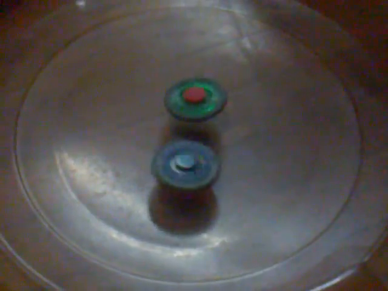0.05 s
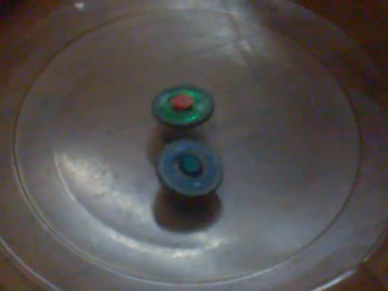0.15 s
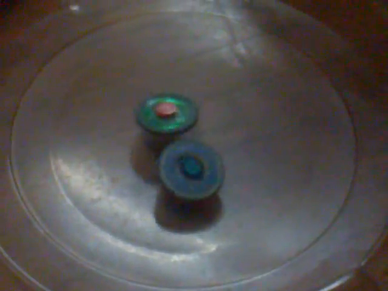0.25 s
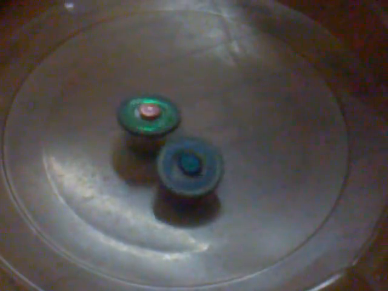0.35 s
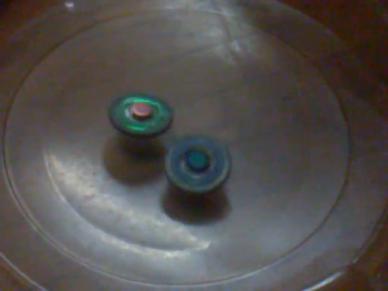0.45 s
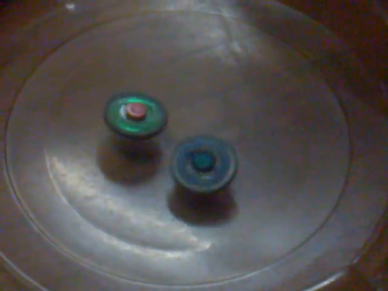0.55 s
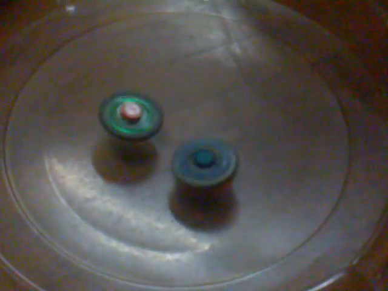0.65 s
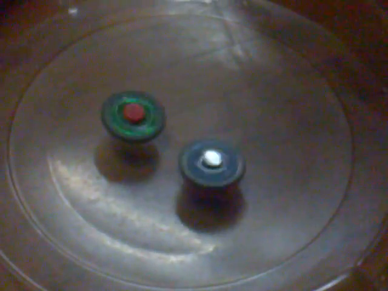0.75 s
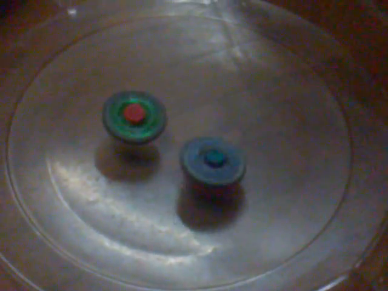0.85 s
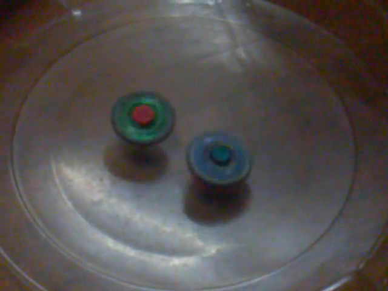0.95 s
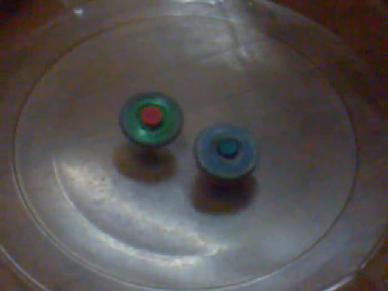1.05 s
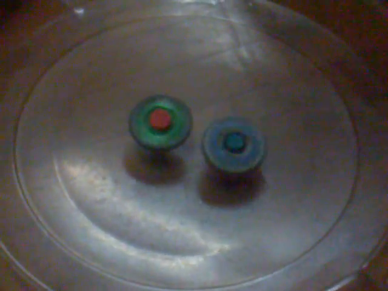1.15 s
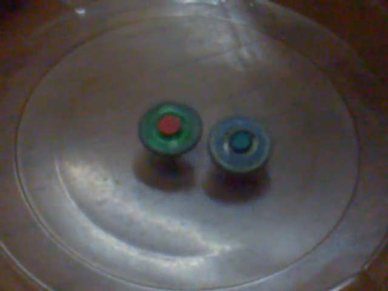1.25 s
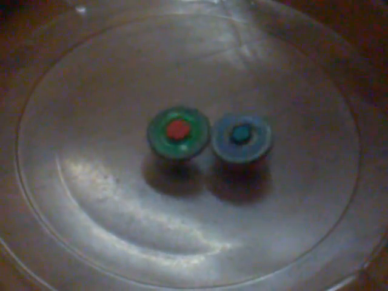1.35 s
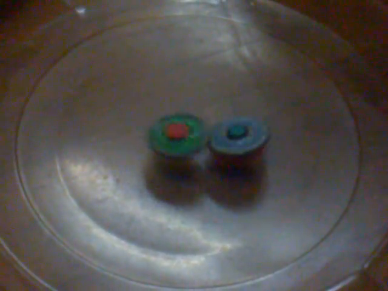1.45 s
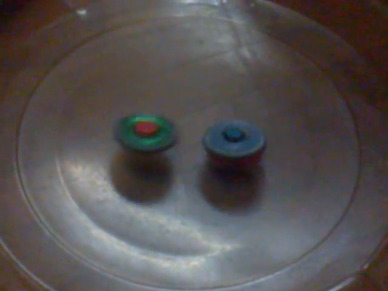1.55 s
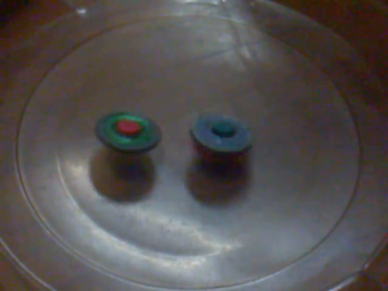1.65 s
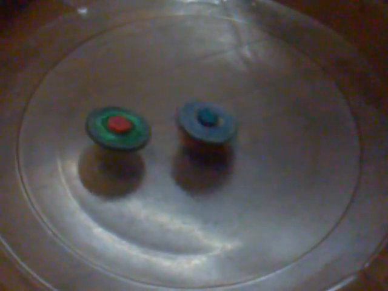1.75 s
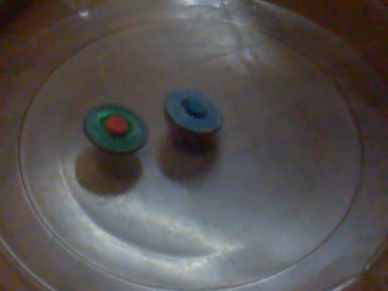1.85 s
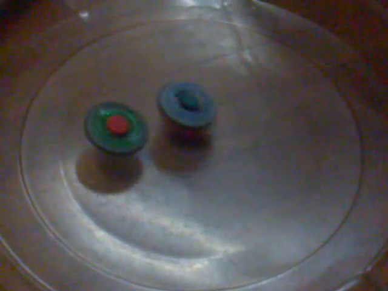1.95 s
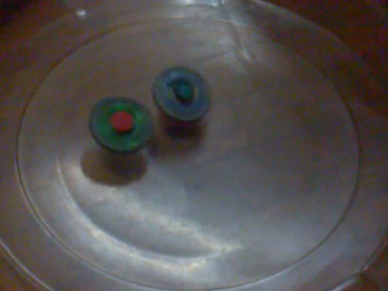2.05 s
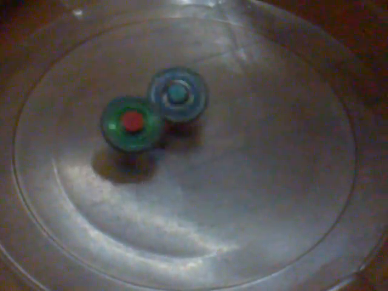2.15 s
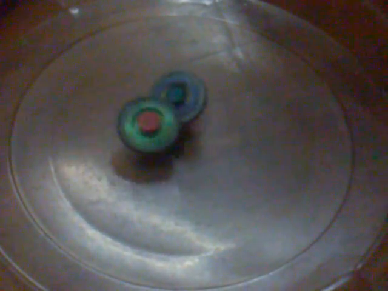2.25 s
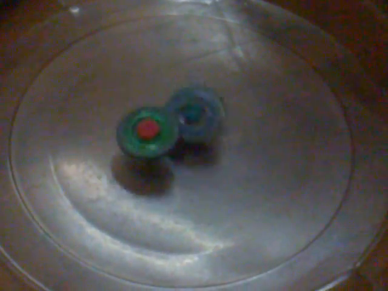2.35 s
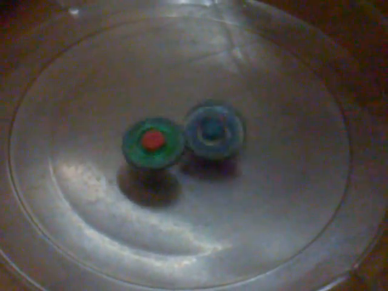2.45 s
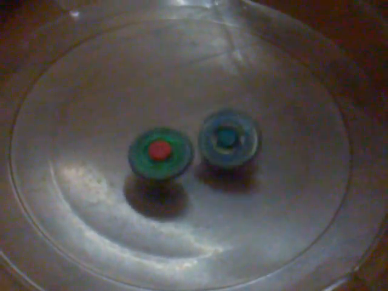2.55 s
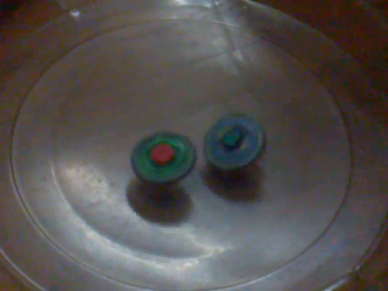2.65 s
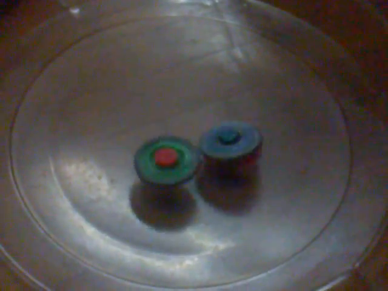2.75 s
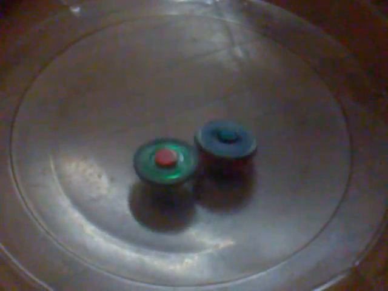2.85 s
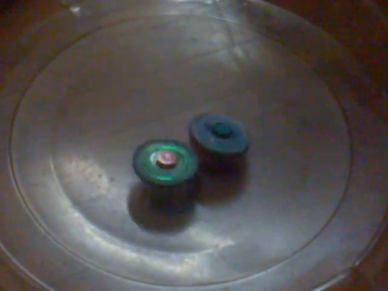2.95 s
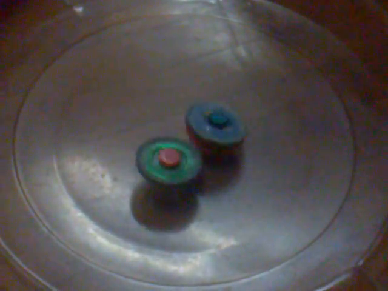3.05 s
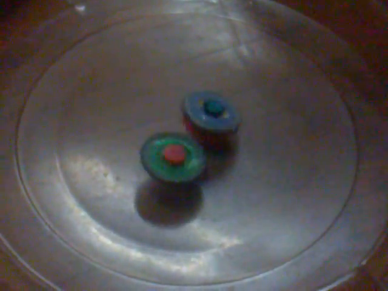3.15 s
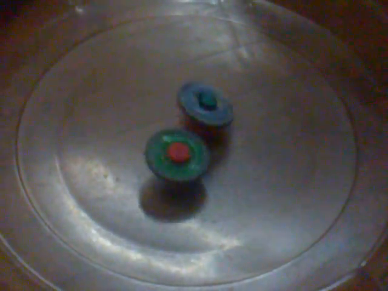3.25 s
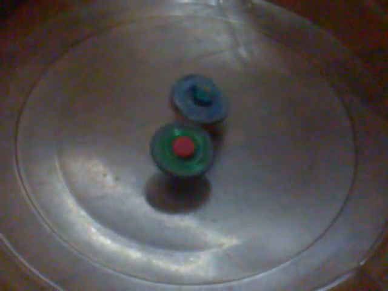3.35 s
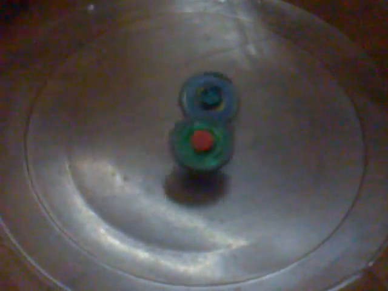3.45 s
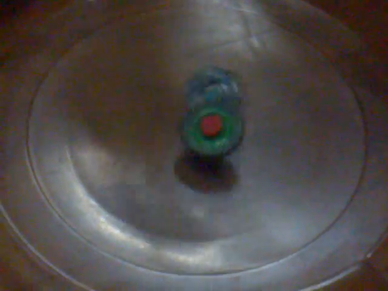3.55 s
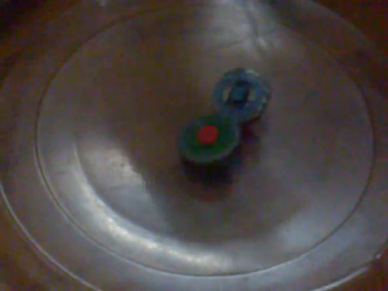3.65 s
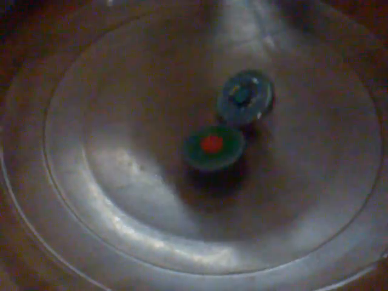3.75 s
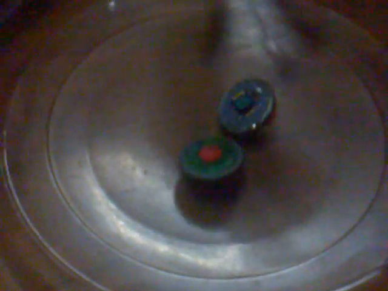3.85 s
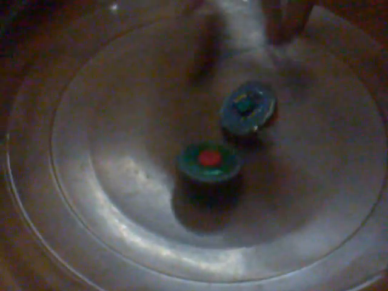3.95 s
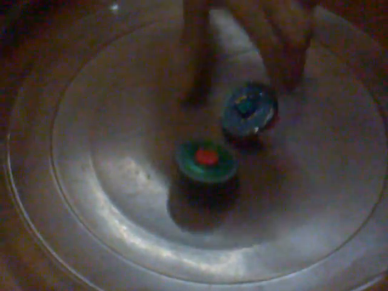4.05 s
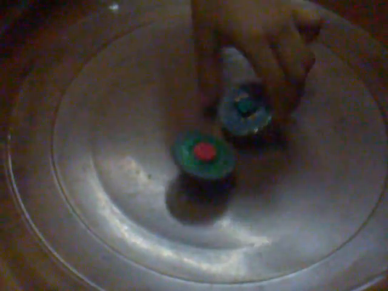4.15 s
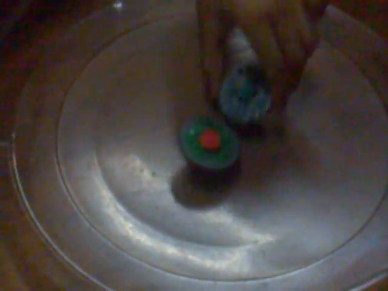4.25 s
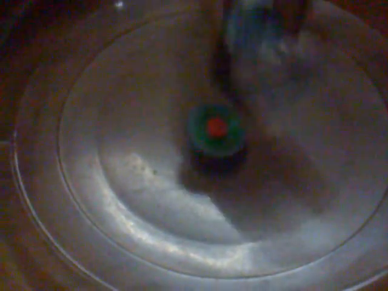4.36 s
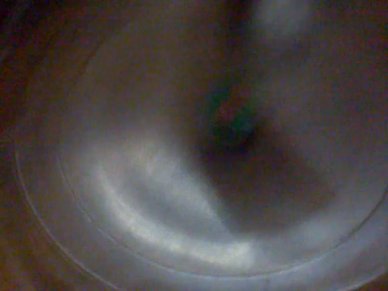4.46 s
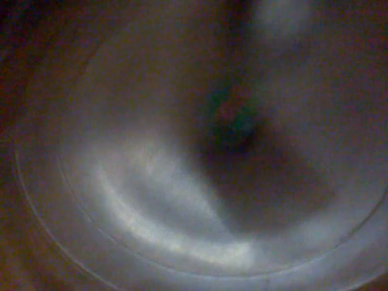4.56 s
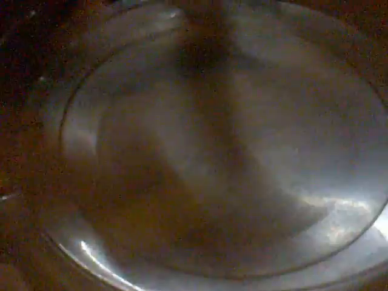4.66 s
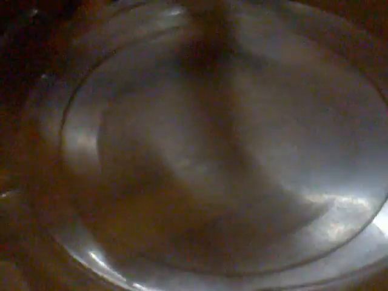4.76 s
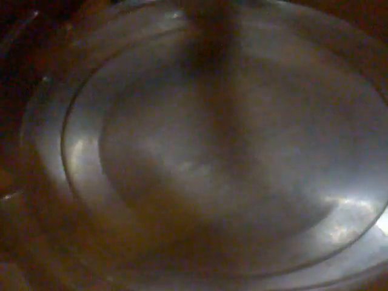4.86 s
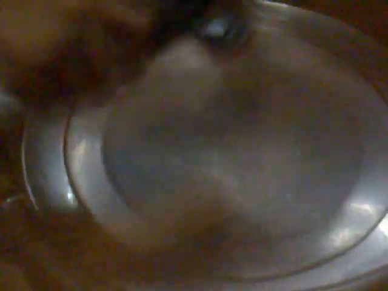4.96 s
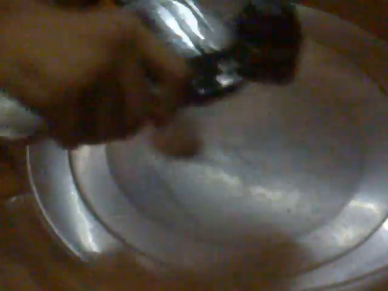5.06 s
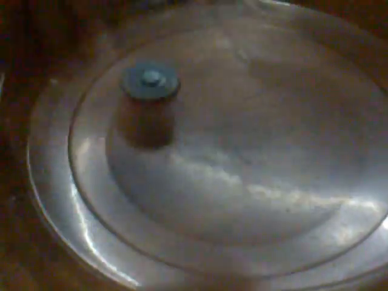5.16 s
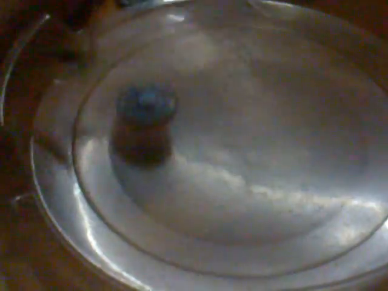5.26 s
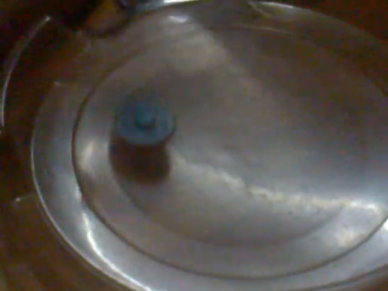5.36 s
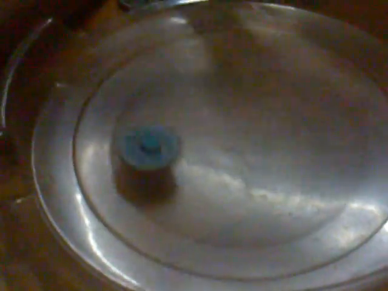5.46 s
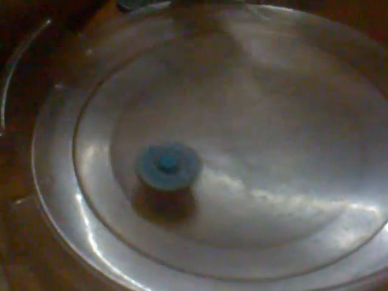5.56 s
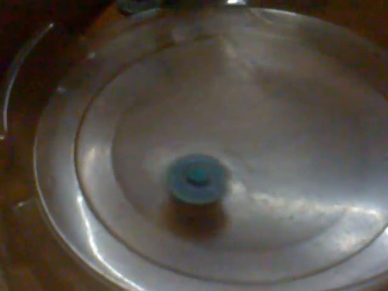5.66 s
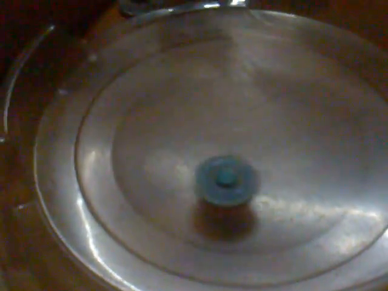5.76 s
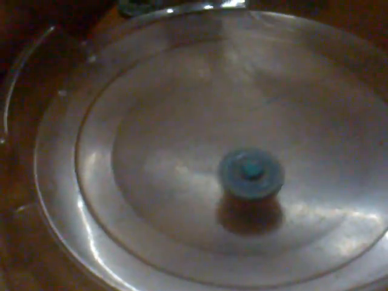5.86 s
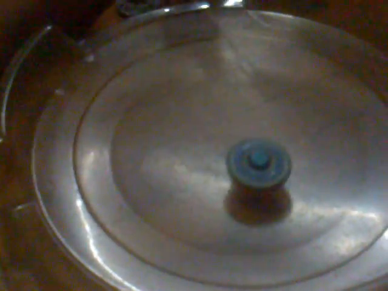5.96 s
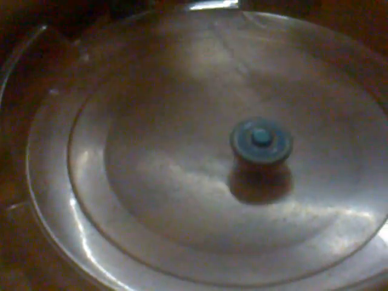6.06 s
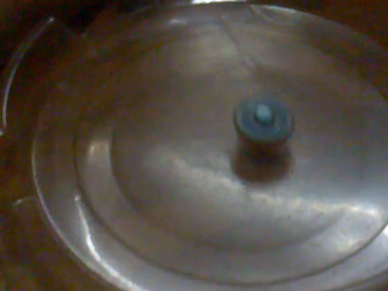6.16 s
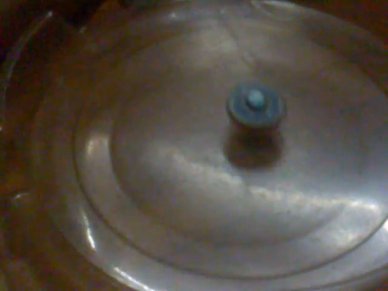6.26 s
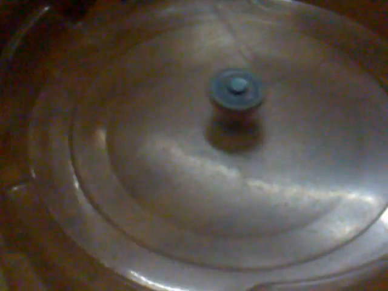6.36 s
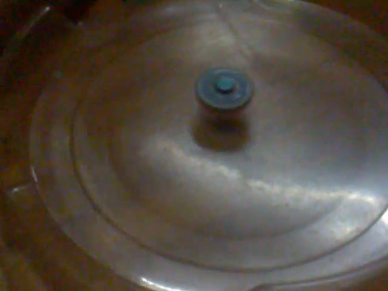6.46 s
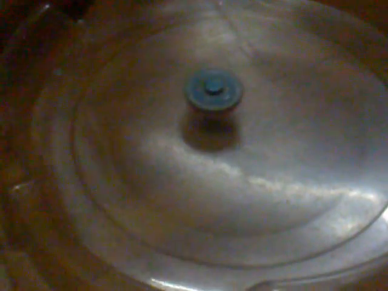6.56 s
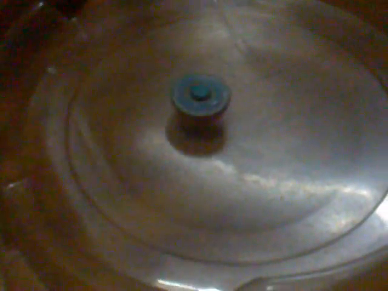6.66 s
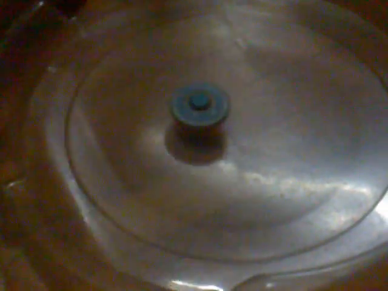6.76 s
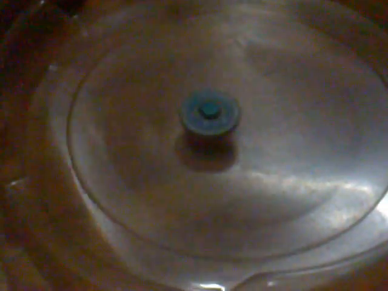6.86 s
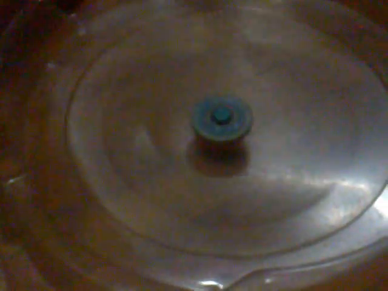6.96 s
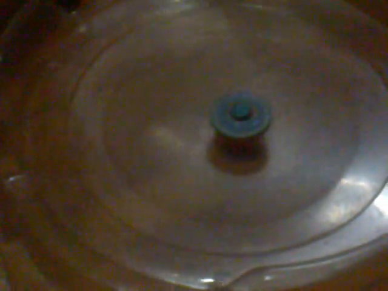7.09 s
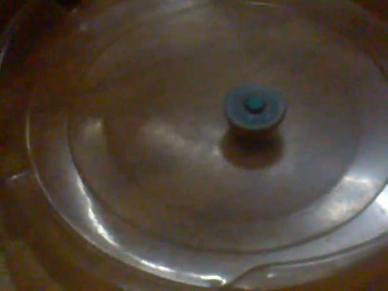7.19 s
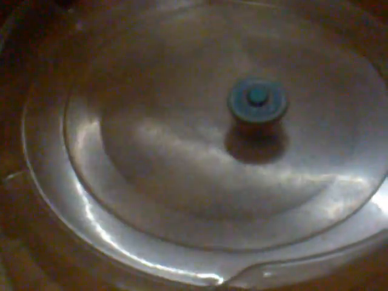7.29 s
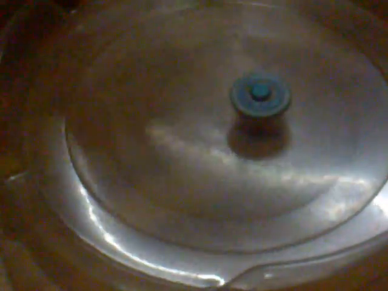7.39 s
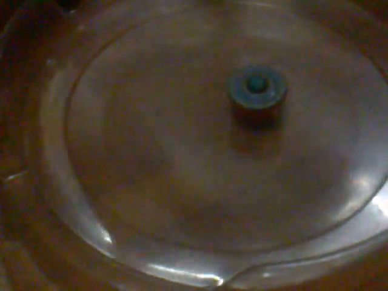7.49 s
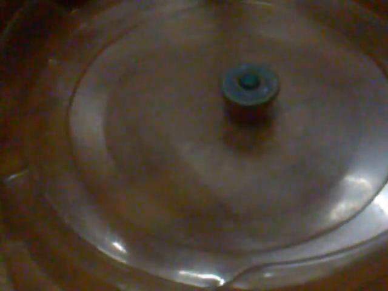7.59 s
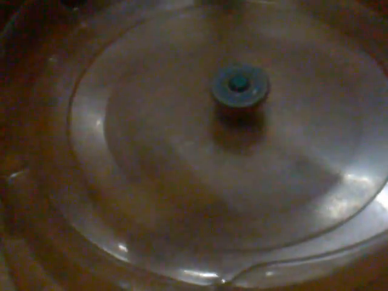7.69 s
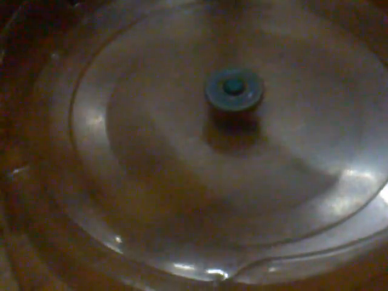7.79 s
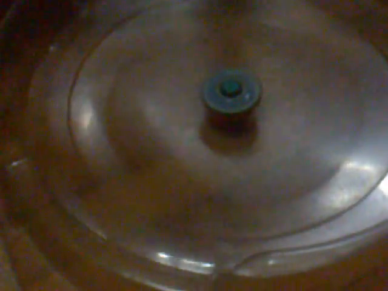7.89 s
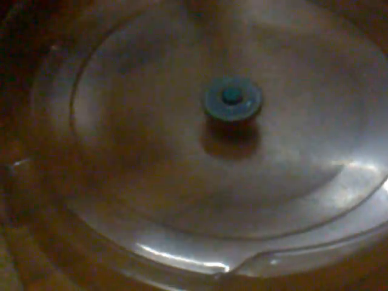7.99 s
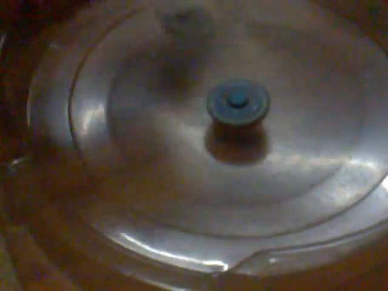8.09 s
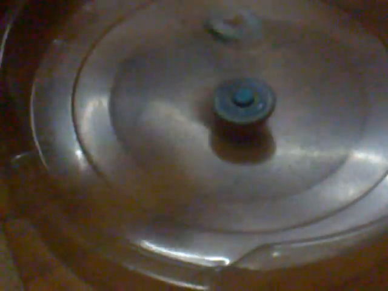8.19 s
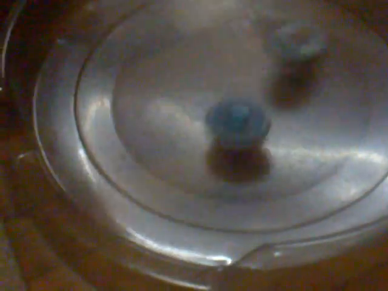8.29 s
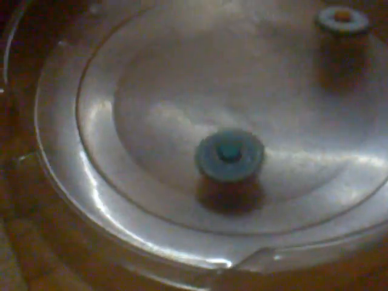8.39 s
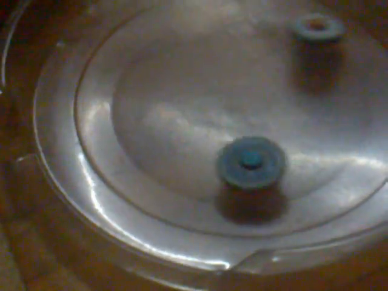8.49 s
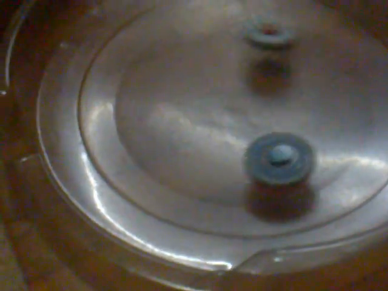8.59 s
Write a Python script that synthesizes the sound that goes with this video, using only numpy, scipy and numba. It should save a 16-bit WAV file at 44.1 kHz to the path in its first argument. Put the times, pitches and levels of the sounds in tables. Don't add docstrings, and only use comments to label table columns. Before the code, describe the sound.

Two plastic spinning tops clatter together in a thin plastic bowl, then a ripcord buzzes and another top drops in, hums, and is joined by one more.

```python
import sys
import numpy as np
from scipy import signal
from scipy.fft import rfft, irfft
from scipy.io import wavfile
from scipy.ndimage import uniform_filter1d
from numba import njit

SR = 44100
rng = np.random.default_rng(int(sys.argv[2]) if len(sys.argv) > 2 else 0)


def amplitude_ratio(level_db):
    exponent = np.asarray(level_db, float) / 20
    return 10 ** exponent


def to_wav(s):
    ch = np.atleast_2d(s).T
    pcm = np.round(np.clip(ch, -1, 1) * 32767)
    wavfile.write(sys.argv[1], SR, pcm.astype(np.int16))


N = 380583

# frequency in Hz, width in Hz, level in dB.
BOWL = [(71, 23, -13.5), (136, 58, -4), (218, 150, -4), (289, 65, -0.5), (344, 60, -1), (468, 63, 1),
        (606, 84, -2), (763, 140, -3), (1015, 82, -4.5)]
# frequency in Hz, width in Hz, level in dB.
TOPS = [(1200, 320, -3.5), (1480, 300, 5), (1800, 270, -1.5), (2150, 300, 0.5), (2480, 410, -2),
        (2728, 400, -3.5), (3150, 270, 2)]
# time in seconds, wobble in dB.
SPIN = [(4.9, -85), (5.5, -63), (5.62, -60), (5.85, -53.5), (6.17, -64), (6.22, -54), (6.4, -52),
        (6.52, -51), (6.66, -68.5), (6.95, -76), (7.05, -56), (7.2, -59), (7.4, -70), (7.6, -74.5),
        (7.7, -62), (7.88, -68), (7.96, -63.5), (8.1, -59)]
# fade starts, silence starts, sound is back, all in seconds.
CUT = (4.622, 4.648, 4.848)


def level(x, db):
    return x * amplitude_ratio(db) / np.sqrt(np.mean(x ** 2))


def peak(x):
    return x / np.abs(x).max()


def band(x, lo_hz, hi_hz):
    return signal.sosfilt(signal.butter(2, [lo_hz, min(hi_hz, .49 * SR)], "band", fs=SR, output="sos"), x)


def body(x, modes, widen):
    out = 0
    for k, (hz, width, db) in enumerate(modes):
        out = out + (-1) ** k * amplitude_ratio(db) * band(x, hz - min(widen * width, hz) / 2, hz + widen * width / 2)
    return out


def curve(table):
    s, *columns = np.transpose(table)
    t = np.arange(N) / SR
    gate = uniform_filter1d(((t > s[0]) & (t < s[-1])) * 1., size=400)
    return gate, [np.interp(t, s, c) for c in columns]


def pulses(hz, jitter, scatter_db):
    waver = uniform_filter1d(rng.standard_normal(N), size=64) * 8
    turns = np.cumsum(hz * np.clip(1 + jitter * waver, .1, 3)) / SR
    sizes = amplitude_ratio(scatter_db * rng.standard_normal(N))
    return (np.diff(np.floor(turns), prepend=0) > 0) * sizes


def grains(rate, spread_db):
    chance, size, sign = rng.random(N), rng.exponential(size=N), rng.standard_normal(N)
    return (chance < rate / SR) * amplitude_ratio(spread_db * size) * np.sign(sign)


def add(out, s, sound):
    i = int(s * SR)
    out[i:i + len(sound)] += sound[:N - i]


def rubbing():
    # time in seconds, pressure in dB.
    press = [(0.0, -77.5), (0.36, -66.5), (0.84, -86), (1.48, -67), (1.63, -39.5), (2.0, -74), (2.3, -53.5),
             (2.48, -37), (2.63, -52.5), (2.92, -63.5), (3.15, -75), (3.27, -59), (3.56, -57), (3.75, -43),
             (4.06, -68), (4.25, -69.5), (4.48, -57.5), (4.62, -64)]
    # time in seconds, pressure in dB.
    skids = [
        [(5.03, -76), (5.18, -37.5), (5.26, -35), (5.34, -36), (5.49, -52), (5.6, -71.5)],
        [(8.1, -58.5), (8.23, -26.5), (8.34, -35.5), (8.47, -24), (8.55, -27.5), (8.63, -41.5)],
    ]
    # frequency in Hz, width in Hz, level in dB.
    scrape_top = [(3278, 1500, -8)]
    rumble = level(body(grains(900, spread_db=2.0), BOWL, widen=1.5), 0)
    scrape = level(body(grains(2000, spread_db=1.8), TOPS[:6] + scrape_top, widen=1.2), 0)
    grit = level(band(grains(7500, spread_db=1.5), 3000, 10000), 0)
    skid_rumble = band(rumble, 180, 3000)
    lone = [(s, db - 4) for s, db in SPIN]
    # path, bowl sound, rumble dB and grit dB at the reference pressure
    paths = [(press, rumble, -51.5, -67), (lone, rumble, -53, -67)]
    paths += [(skid, skid_rumble, -46, -67.5) for skid in skids]
    out = 0
    for table, bowl, rumble_db, grit_db in paths:
        gate, (db,) = curve(table)
        over_db = db + 50
        low = amplitude_ratio(rumble_db + 0.84 * over_db) * bowl
        high = amplitude_ratio(grit_db + 0.96 * over_db) * grit
        out = out + gate * (low + amplitude_ratio(db) * scrape + high)
    return out


def air():
    # frequency in Hz, level in dB per Hz.
    murmur = [(15, -25), (40, -6.5), (70, -2), (190, -10), (677, -20), (840, -16.5), (1330, -19.5),
              (2760, -29), (16000, -33.5)]
    hz, db = np.transpose(murmur)
    f = np.arange(N // 2 + 1) * SR / N + 1
    shaped = rfft(rng.standard_normal(N)) * amplitude_ratio(np.interp(np.log(f), np.log(hz), db))
    hiss = level(band(rng.standard_normal(N), 4400, 23000), -78.5)
    return level(irfft(shaped, N), -64) + hiss


def blow(s, hz, boom_db, crack_db, chatter_s, snap, bright):
    t = np.arange(4000) / SR
    noise = rng.standard_normal((3, len(t)))
    to_zero = np.cos(np.pi / 2 * t / t[-1])
    launched = s > CUT[0]
    tail = (22 * chatter_s if snap else 0.04) * np.exp(-t / 0.061) * to_zero
    onset = 1 - np.exp(-t / (0.0008 if snap else 0.00025))
    push = (np.exp(-t / chatter_s) + tail) * onset
    near_db, upper_db = (3.5, 3.5) if snap else (7, 0)
    struck = [(f, w, g + upper_db * np.log2(f / 700) - near_db * abs(np.log2(f / hz)))
              for f, w, g in TOPS + bright]
    contacts = noise[0] * abs(noise[0]) * push
    own = band(contacts, .85 * hz, 1.15 * hz)
    clack = peak(body(contacts, struck, widen=0.85)) + (0.15 if snap else 0.75) * peak(own)
    if snap:
        clack = clack + 0.6 * peak(band(contacts, 1000, 5500))
    tilt_db = 4 * launched
    rung = [(f, w, g + tilt_db * np.log2(f / 400)) for f, w, g in BOWL]
    boom = body(noise[1] * np.exp(-t / (3 * chatter_s)), rung, widen=1.276)
    crack = band(noise[2], 3500, 9700) + 0.73 * amplitude_ratio(0.4 * crack_db) * band(noise[2], 9000, 13000)
    crack = crack * push ** 0.66 * np.exp(-t / 0.12)
    thud = band(noise[1] * np.exp(-t / 0.038), 52, 210) * to_zero
    thud_db = -39 if launched else -23
    return (peak(clack) + amplitude_ratio(boom_db) * peak(boom) + amplitude_ratio(crack_db) * peak(crack)
            + amplitude_ratio(thud_db) * peak(thud))


def knocks():
    # start in seconds, peak in dB, pitch in Hz.
    ticks = [(0.0424, -52.5, 1620), (0.0837, -55, 2110), (0.157, -48, 2480), (0.1986, -47, 1590),
             (0.2531, -49, 1620), (0.367, -50, 2360), (0.405, -45, 1890), (0.4199, -54, 2150),
             (0.455, -47.5, 2160), (0.5284, -43, 1420), (0.6177, -51.5, 1450), (0.7427, -49.5, 1380),
             (1.0394, -55, 2420), (1.2063, -49, 1230), (1.3744, -55.5, 2100), (0.129, -51, 2500),
             (0.286, -55, 1680), (0.33, -59, 2200), (0.58, -53, 2500), (1.242, -54, 1600),
             (1.332, -55, 2200), (1.6462, -23, 1800), (1.872, -37, 3200), (1.94, -44, 1500),
             (1.986, -48, 1500), (2.007, -46, 2400), (2.083, -52, 1500), (2.128, -59.5, 2500),
             (2.159, -47, 1600), (2.176, -45, 1500)]
    # start in seconds, peak in dB, pitch in Hz, crack in dB over clack.
    clashes = [(1.4478, -32, 1890, -6), (1.477, -14.5, 2560, -1.5), (1.492, -11.5, 2150, -1.5),
               (1.5071, -4, 1490, -2), (1.5402, -6.5, 2150, -1), (1.5521, -9.5, 1560, -9.5),
               (1.5595, -9.5, 1530, -5.5), (1.5868, -10.5, 1520, -18), (1.605, -17.5, 1360, -22),
               (1.6213, -14.5, 2520, -21.5), (1.706, -25, 1550, -26), (1.7411, -29, 1990, -28.5),
               (1.7594, -28.5, 1960, -15.5), (1.7958, -34, 1340, -25), (1.8405, -33, 1400, -14),
               (1.8932, -32.5, 1640, -17.5), (2.2225, -34, 1750, -27), (2.2613, -29.5, 1780, -31.5),
               (2.3354, -24.5, 1600, -9), (2.3538, -8.5, 3040, -8), (2.369, -7, 1730, -4),
               (2.3837, -8.5, 1670, -19), (2.4054, -13.5, 1510, -24), (2.4276, -20.5, 3110, -10.5),
               (2.448, -14, 2200, -16.5), (2.4646, -9.5, 1430, -30), (2.4851, -10, 1570, -20.5),
               (2.5326, -16, 1500, -23.5), (2.5705, -19.5, 1740, -21), (2.6558, -26, 1610, -31.5)]
    # start in seconds, peak in dB, pitch in Hz, crack in dB over clack.
    collisions = [(1.6692, -27, 1490, -25), (1.684, -27, 1600, -25), (1.7195, -28, 1900, -25),
                  (1.73, -31, 1500, -25), (1.805, -36, 1500, -25), (1.853, -38, 1500, -25),
                  (1.905, -40, 1500, -25), (2.344, -26, 2000, -10), (2.396, -16, 1900, -15),
                  (2.5125, -19, 2000, -20), (2.5539, -23, 1730, -20), (2.592, -28, 1800, -20),
                  (2.612, -30, 1700, -20), (2.628, -31, 1700, -20), (2.6651, -27, 1900, -25),
                  (3.601, -27, 3100, -20), (3.651, -8, 1700, -15), (3.721, -17, 1900, -15),
                  (3.745, -24, 1500, -20), (3.845, -29, 1600, -25), (3.86, -30, 1600, -25),
                  (3.873, -30, 1600, -22), (3.89, -36, 1600, -25), (3.912, -38, 1500, -25),
                  (3.936, -41, 1700, -25), (3.9751, -46, 1490, -25), (4.1462, -54, 1560, -25),
                  (4.2355, -50, 1310, -25), (4.251, -42, 3000, -25), (4.2929, -44, 1500, -25),
                  (4.31, -44, 1600, -25), (4.3622, -47, 1740, -25), (4.3737, -44, 1800, -25),
                  (4.412, -45, 3500, -25), (4.4196, -42, 1740, -25), (4.4435, -46, 1500, -25),
                  (4.4685, -44, 1550, -25), (4.484, -46, 2400, -25), (4.506, -36, 1700, -25),
                  (4.537, -35, 1700, -25), (4.5767, -32, 1460, -18), (4.603, -37, 1700, -25),
                  (2.7534, -48, 1900, -37.5), (2.8114, -27.5, 1560, -35.5), (2.823, -24, 2100, -24),
             (2.8862, -34.5, 3980, -7), (3.0927, -30.5, 1685, -28.5), (3.1074, -30.5, 1480, -15.5),
             (3.2025, -23.5, 1540, -25.5), (3.2185, -18, 1840, -32), (3.2359, -23.5, 1500, -20.5),
             (3.3248, -26, 1595, -30), (3.3444, -22, 2170, -22), (3.3608, -27, 2347, -22.5),
             (3.3755, -25.5, 2502, -25.5), (3.5913, -26, 1420, -18.5), (3.617, -19, 2378, -4.5),
             (3.631, 1, 1699, -10.5), (3.6437, -5, 1634, -6.5), (3.669, -9, 1480, -7.5),
             (3.6794, -10.5, 2360, -6), (3.698, -5.5, 2229, -10.5), (3.8311, -28, 1520, -37.5),
             (4, -41, 1580, -16), (4.0203, -39, 1800, -15.5), (4.269, -32.5, 1750, -18.5),
             (4.3284, -37.5, 1920, -28), (4.3869, -40.5, 1410, -36), (4.5229, -28.5, 1440, -22),
             (4.554, -29.5, 1850, -26), (4.59, -29, 1696, -27.5), (4.6166, -45.5, 1370, -18)]
    # start in seconds, peak in dB, pitch in Hz, boom in dB over clack.
    landings = [(4.996, -29, 2220, -21.5), (5.021, -27, 2440, -30), (5.198, -1, 1770, 4.5),
                (5.2124, -1.5, 1260, -12.5), (5.3273, -7, 1300, -0.5), (5.3567, -8.5, 1530, -6),
                (5.3934, -14.5, 2530, -12), (5.4058, -17, 1390, -3.5), (5.4145, -15.5, 1730, 7),
                (5.4485, -24, 1510, 0), (5.5317, -33.5, 1360, -25), (5.9861, -47.5, 4400, 1),
                (6.3807, -25, 2370, -42), (7.142, -40.5, 1500, -8), (7.666, -43.5, 2360, -18),
                (8.2137, -1, 1090, 0.5), (8.2311, -0.5, 1413, -4), (8.2583, -8.5, 1120, -2),
                (8.2807, -13, 1510, -9), (8.3535, 2.5, 2480, -19.5), (8.3745, -5, 1700, 0),
                (8.4325, -10, 1600, 1), (8.4466, -7.5, 1370, -5), (8.461, -14.5, 1290, -2.5),
                (8.4751, -12, 1270, 5.5), (8.5009, 0, 1024, -8.5), (8.5282, -10, 1600, 3.5),
                (8.551, -15, 2380, 3.5), (8.5856, -22.5, 1410, -17), (8.6174, -22, 2040, -18.5)]
    # start in seconds, peak in dB, pitch in Hz, crack in dB, chatter in seconds.
    snaps = [
        (4.4978, -21, 1800, -28, 0.0007),
        (5.7588, -8, 4470, -13, 0.0017),
        (6.4651, -20, 2270, -23, 0.0031),
        (7.0206, -18.5, 2800, -13, .002),
        (8.038, -18.5, 2400, -18, 0.0025),
        (7.012, -36.5, 2400, -20, .002),
        (8.031, -28.5, 1600, -18.5, 0.0026),
        (8.087, -19.5, 2500, -19, .002),
        (8.378, -14, 2400, -12, 0.0036),
        (6.209, -45, 2500, -23, .002),
    ]
    # frequency in Hz, width in Hz, level in dB.
    bright = [(3670, 500, -6.5), (4520, 500, -8.5), (5080, 450, -14), (6500, 630, -14)]
    blows = [(s, db, hz, -11, -33, .0043, False) for s, db, hz in ticks]
    blows += [(s, db, hz, -11.5, crack, .0038, False) for s, db, hz, crack in clashes]
    blows += [(s, db, hz, -9, crack, .0038, False) for s, db, hz, crack in collisions]
    blows += [(s, db, hz, boom - 3, -19.5, .0043, False) for s, db, hz, boom in landings]
    blows += [(s, db, hz, -24, crack, chatter, True) for s, db, hz, crack, chatter in snaps]
    out = np.zeros(N)
    for s, db, *how in blows:
        add(out, s - .0008, amplitude_ratio(db) * blow(s, *how, bright))
    return out


def rim():
    # frequency in Hz, level in dB, 60 dB decay in seconds.
    partials = [(2480, -3, .05), (5486, -1.5, .16), (5440, -9, .08), (5631, -9.5, .2), (5330, -16, .08),
                (12460, -15, .14), (12330, -20, .1)]
    # start in seconds, level in dB.
    hits = [
        (8.354, -7.5),
        (8.432, -27),
        (8.475, -33),
    ]
    # start in seconds, level in dB, frequency in Hz, 60 dB decay in seconds.
    chimes = [
        (1.448, -49, 4220, .11),
        (2.885, -47, 4330, .13),
        (2.886, -51, 4480, .09),
        (2.886, -55, 4850, .14),
        (2.887, -53, 5200, .07),
        (7.815, -68, 6560, .1),
        (7.17, -66, 6560, .07),
        (0.455, -66, 6560, .1),
        (2.4485, -28, 7250, .03),
    ]
    out, t = np.zeros(N), np.arange(13000) / SR

    def tone(db, hz, t60):
        flutter = amplitude_ratio(2.5 * level(band(rng.standard_normal(len(t)), 40, 200), 0))
        return amplitude_ratio(db) * flutter * np.sin(2 * np.pi * hz * t) * 1000. ** (-t / t60)

    ring = sum(tone(db, hz, t60) for hz, db, t60 in partials)
    ring = ring + level(band(rng.standard_normal(len(t)), 6000, 15000), -16) * 1000. ** (-t / .22)
    for s, db in hits:
        add(out, s, amplitude_ratio(db) * ring)
    for s, db, hz, t60 in chimes:
        add(out, s, tone(db, hz, t60))
    return out


def click():
    near_click = (3.4936, -16, .0005)
    s, db, fade = near_click
    out, t = np.zeros(N), np.arange(600) / SR
    add(out, s - fade, amplitude_ratio(db) * peak(band(rng.standard_normal(len(t)) * t * np.exp(-t / fade), 490, 4300)))
    return out


def thump():
    finger = (4.4998, -19, 100, .0024)
    s, db, hz, fade = finger
    out, t = np.zeros(N), np.arange(3000) / SR
    add(out, s, amplitude_ratio(db) * np.e * band(np.sin(2 * np.pi * hz * t) * np.exp(-t / fade), 35, 3000))
    return out


def lone_top():
    # multiple of the spin rate, level in dB.
    harmonics = [(1, 0.5), (2, 0), (3, -14), (4, -3.5), (5, -4.5), (6, -5.5), (7, -2.5), (8, -13.5),
                 (9, -9), (10, -7), (11, -10), (14, -10)]
    # from in seconds, to in seconds, ticks louder by dB.
    rough_patch = (6.2, 6.45, 8.3)
    gate, (hum_db,) = curve(SPIN)
    hz = 70.7 - 0.96 * (np.arange(N) / SR - SPIN[1][0]) + 0.13 * (hum_db + 65)
    on_patch = curve([rough_patch[:1], rough_patch[1:2]])[0]
    tick_db = -65 + 1.1 * (hum_db + 60) + rough_patch[2] * on_patch
    turns = np.cumsum(hz) / SR

    def wander():
        return level(band(rng.standard_normal(N), 1.9, 4.2), 0)

    hum = sum(amplitude_ratio(db + 3.5 * wander()) * np.sin(2 * np.pi * (k * turns + rng.random()))
              for k, db in harmonics)
    contact = amplitude_ratio(3. * wander()) * np.exp(-(turns % 1) / .14) * rng.standard_normal(N)
    tick = body(contact, BOWL[-1:] + TOPS, widen=1.0)
    return gate * (amplitude_ratio(hum_db + 0.7) * level(hum, 0) + amplitude_ratio(tick_db) * level(tick, 0))


def ripcords():
    # catches, fastest and runs out in seconds, peak in dB, rise in dB per second.
    pulls = [
        (5.084, 5.125, 5.16, -9.5, 800),
        (8.104, 8.155, 8.19, -8.5, 1200),
    ]
    # frequency in Hz, width in Hz, level in dB.
    housings = [
        [(1500, 400, -8), (2350, 300, 3), (2560, 360, -3.5), (3210, 110, 3.5), (4003, 400, -9.5)],
        [(1540, 680, -2.5), (2325, 220, 11.5), (2850, 280, -6), (3190, 290, 2.5), (4400, 710, -9.5)],
    ]
    # time in seconds, level in dB, width in seconds.
    slips = [
        (5.088, -5, .003),
        (5.1, -4, .003),
        (5.128, -8, .003),
        (5.17, -4, .004),
        (5.178, 5, .003),
        (8.11, -5, .003),
        (8.121, -8, .002),
        (8.127, -7, .003),
        (8.153, -9, .003),
        (8.196, -3, .003),
    ]
    out = 0
    t = np.arange(N) / SR
    for (catch, fast, end, peak_db, rise), housing in zip(pulls, housings):
        early = np.maximum(catch - t, 0)
        db = peak_db + np.maximum(-rise * early, -20 - 350 * early)
        db = db - 90 * np.clip(fast - t, 0, fast - catch) - 279.5 * np.maximum(t - end, 0)
        treble_db = -21 + 13.5 * np.exp(-((t - fast - .015) / .028) ** 2) - 150 * early
        teeth = pulses(600, jitter=.4, scatter_db=1.5) + 0.15 * rng.standard_normal(N)
        snag_db = level(band(rng.standard_normal(N), 60, 200), 4)
        slip_db = sum(g * np.exp(-((t - s) / w) ** 2) for s, g, w in slips)
        teeth = teeth * amplitude_ratio(slip_db + snag_db)
        treble = band(teeth, 3300, 9000) + 0.45 * band(teeth, 8500, 13000)
        buzz = band(body(teeth, housing, widen=1.35) + 0.2 * band(teeth, 900, 6000), 800, 12000)
        shake = level(band(rng.standard_normal(N), 20, 140), -29)
        out = out + amplitude_ratio(db) * (level(buzz, 0) + level(treble, 0) * amplitude_ratio(treble_db) + shake)
    return out


def bonks():
    # start in seconds, peak in dB, pitch in Hz.
    drops = [(5.198, -3, 275), (5.211, -1, 799), (5.231, -8, 974), (5.247, -10, 495), (5.329, -16, 151),
             (5.329, -8, 256), (5.356, -14, 495), (5.393, -17, 563), (5.414, -14, 869), (5.448, -20, 1030),
             (8.216, -3, 746), (8.23, -3, 789), (8.244, -8, 799), (8.257, -5, 716), (8.28, -13, 694),
             (8.372, -6, 266), (8.432, -10, 299), (8.446, -5, 471), (8.46, -9, 433), (8.474, -11, 468),
             (8.488, -7, 606), (8.5, -5, 1100), (8.507, -6, 826), (8.518, -9, 673), (8.527, -9, 565),
             (8.538, -9, 366), (8.55, -8, 810), (8.561, -14, 692)]
    out, t = np.zeros(N), np.arange(3000) / SR
    for s, db, hz in drops:
        ring = band(rng.standard_normal(len(t)) * np.exp(-t / .009), hz / 1.3, hz * 1.3)
        add(out, s - .001, amplitude_ratio(db - 2) * peak(ring))
    return out


def scuff():
    # time in seconds, level in dB.
    slide = [
        (5.5, -62),
        (5.55, -57),
        (5.575, -52),
        (5.6, -60),
        (5.66, -63),
        (5.71, -52),
        (5.76, -54),
        (5.8, -62),
    ]
    gate, (db,) = curve(slide)
    return gate * amplitude_ratio(db) * level(band(grains(3300, spread_db=3.0), 3500, 4450), 0)


@njit
def walls(x, lags, gain, damp):
    line, soft, out = np.zeros((8, 4096)), np.zeros(8), np.zeros(len(x))
    for i in range(len(x)):
        total = 0.
        for k in range(8):
            soft[k] += (1 - damp) * (gain[k] * line[k, (i - lags[k]) & 4095] - soft[k])
            total += soft[k]
        out[i] = soft[0] - soft[3] + soft[5] - soft[6]
        for k in range(8):
            line[k, i & 4095] = x[i] + soft[k] - total / 4
    return out


def scene():
    loud = knocks() + rim() + ripcords() + bonks()
    lags = np.array([331, 457, 613, 797, 1021, 1283, 1597, 1931])
    room_t60_s, room_damp, room_db = 0.3, 0.51, -12.5
    room = walls(loud + 1e-18, lags, amplitude_ratio(-60 * lags / SR / room_t60_s), room_damp)
    quiet = rubbing() + air() + click() + thump() + lone_top() + scuff()
    return (loud + amplitude_ratio(room_db) * room + quiet)[None]


def top_cut(x):
    return signal.sosfilt(signal.butter(12, 16470, fs=SR, output="sos"), x)


def record(dry):
    t = np.arange(N) / SR
    fade_s, silent_s, back_s = CUT
    on = np.where(t < fade_s, 1, np.where(t < silent_s, amplitude_ratio(-20), (t > back_s) * 1.))
    clip = .71
    x = dry * on / clip
    x = clip * x / (1 + x ** 6) ** (1 / 6)
    x = signal.sosfilt(signal.ellip(6, .3, 50, 15750, fs=SR, output="sos"), x)
    return top_cut(x)


dry = scene()
out = record(dry)
to_wav(out)
```